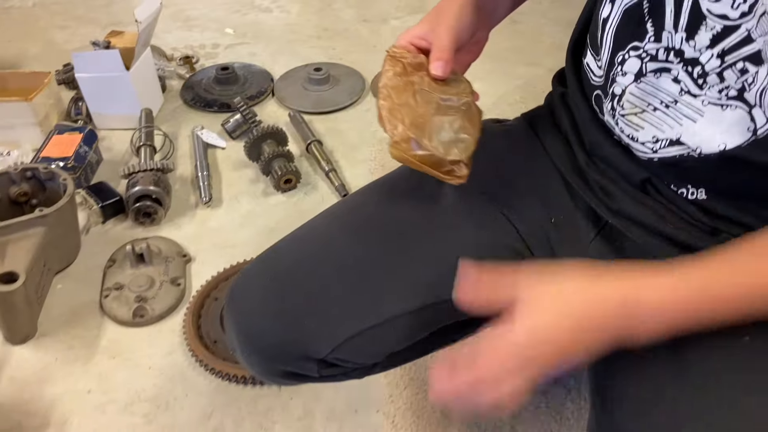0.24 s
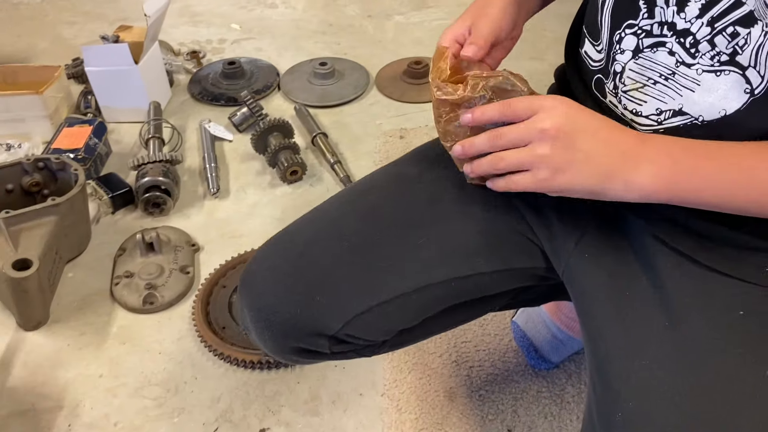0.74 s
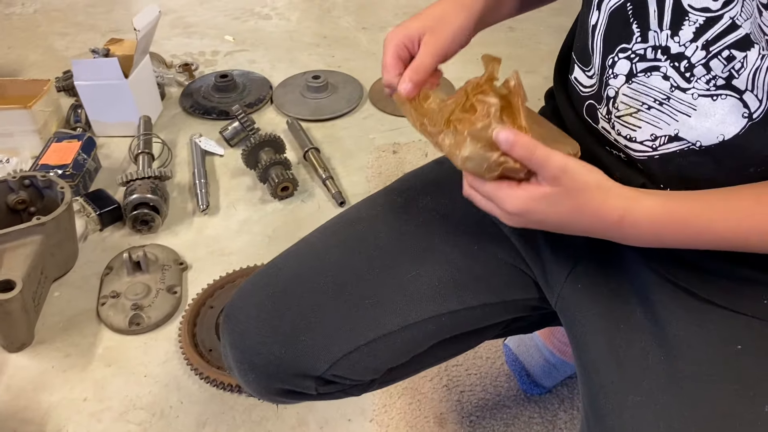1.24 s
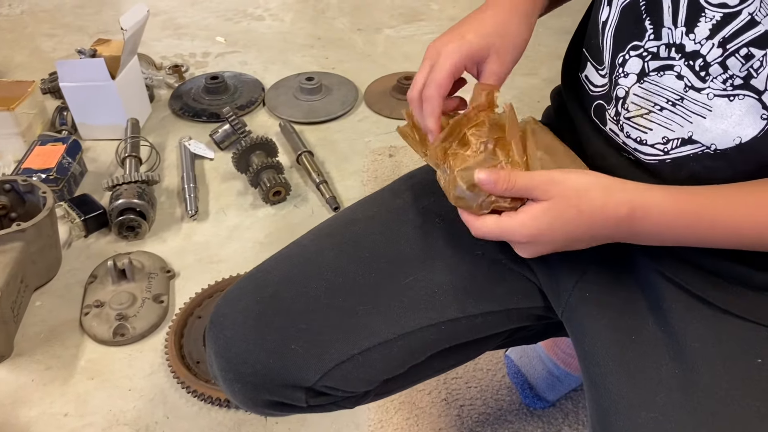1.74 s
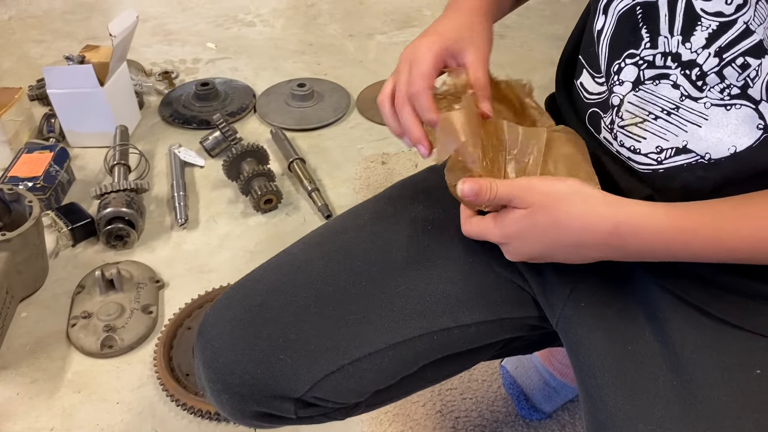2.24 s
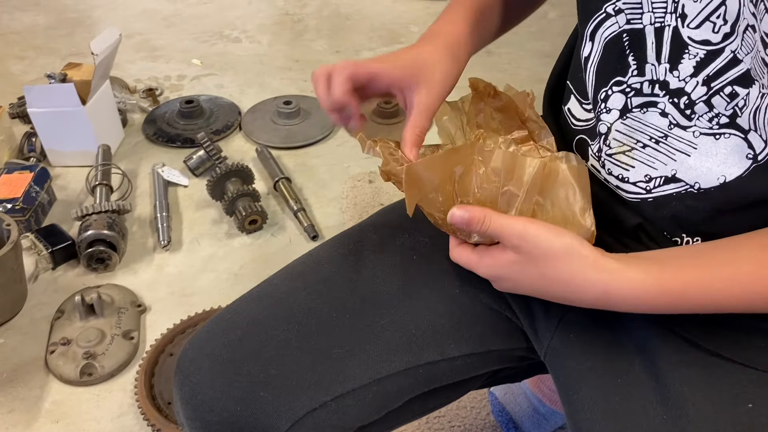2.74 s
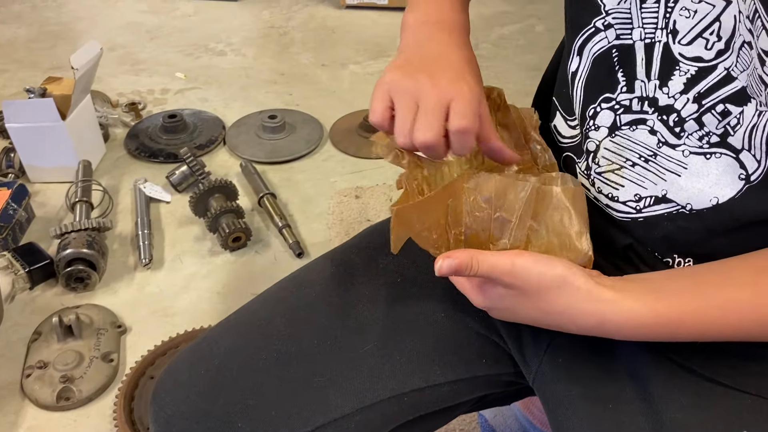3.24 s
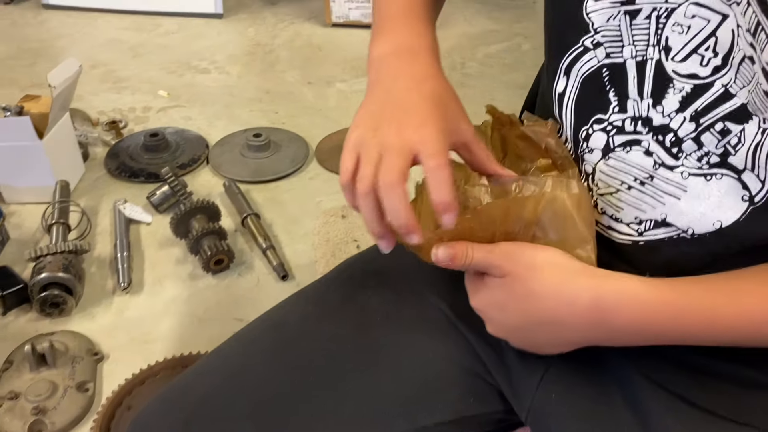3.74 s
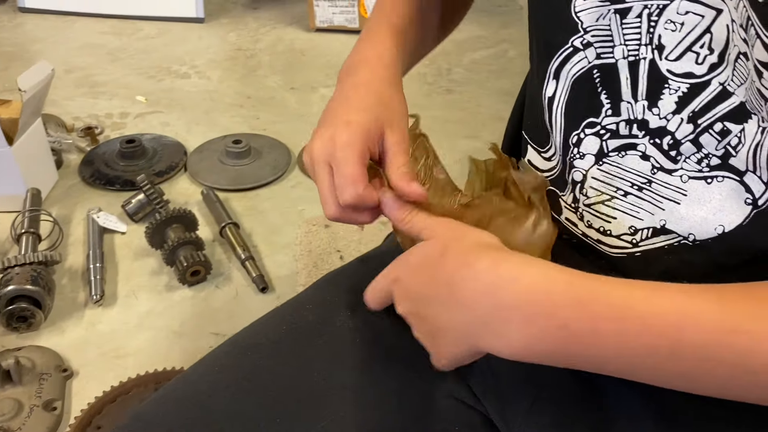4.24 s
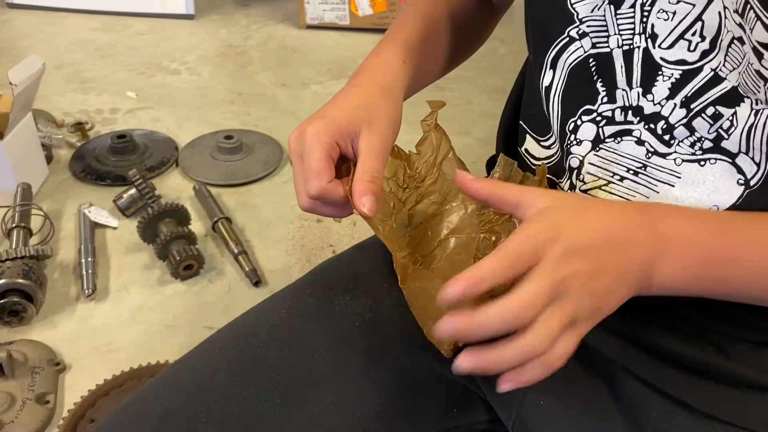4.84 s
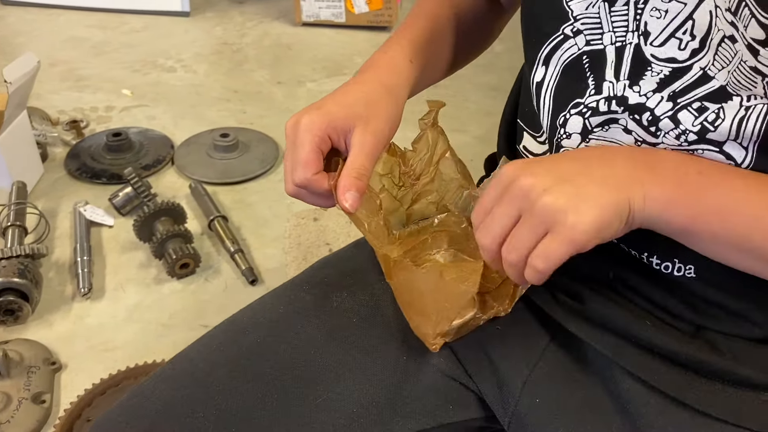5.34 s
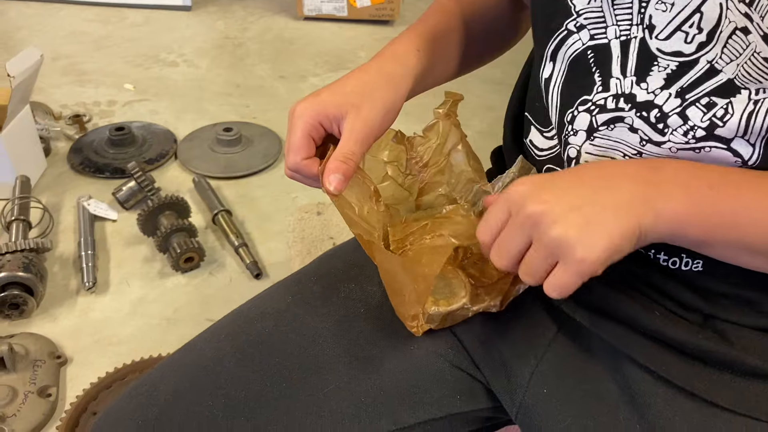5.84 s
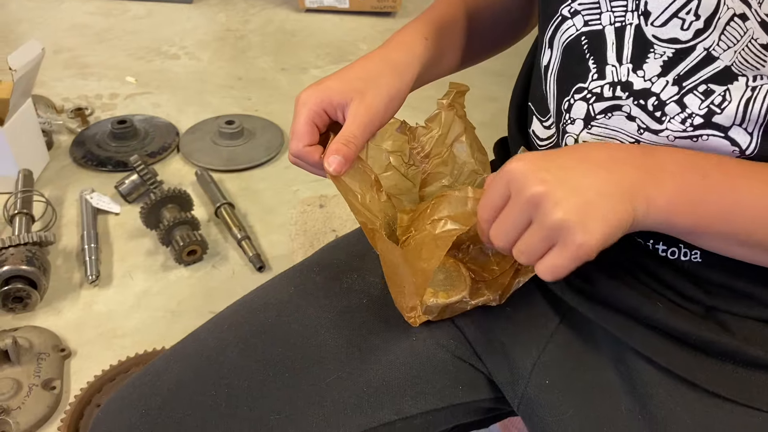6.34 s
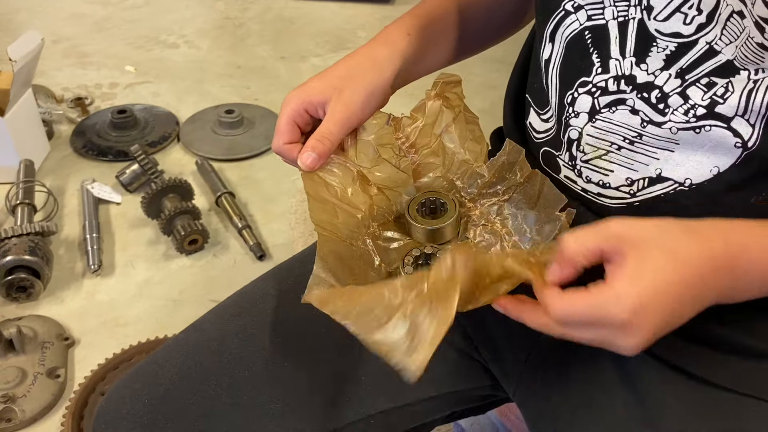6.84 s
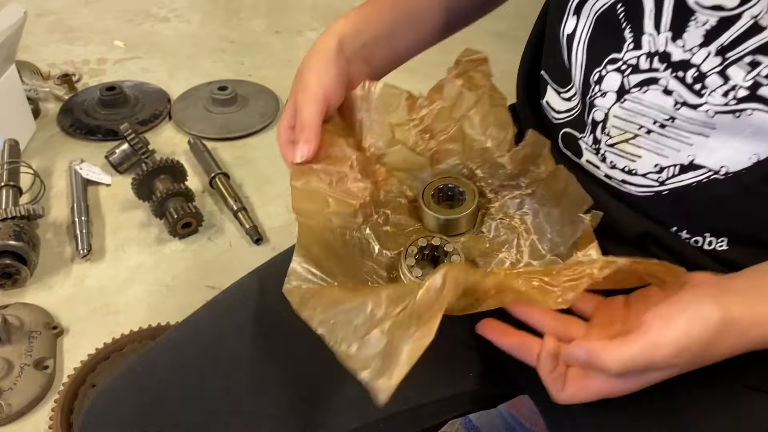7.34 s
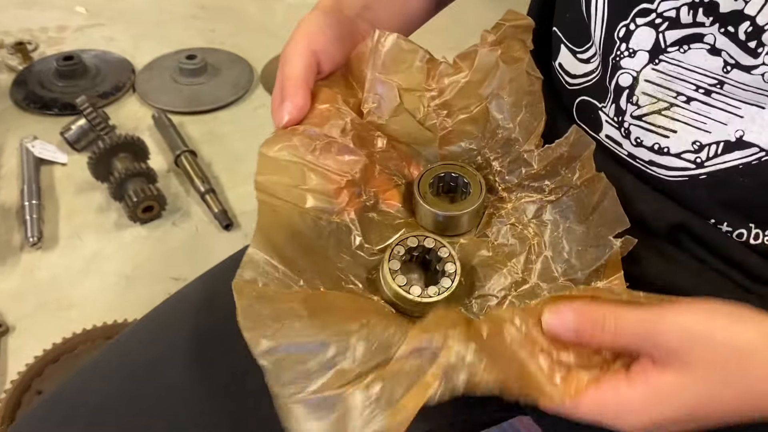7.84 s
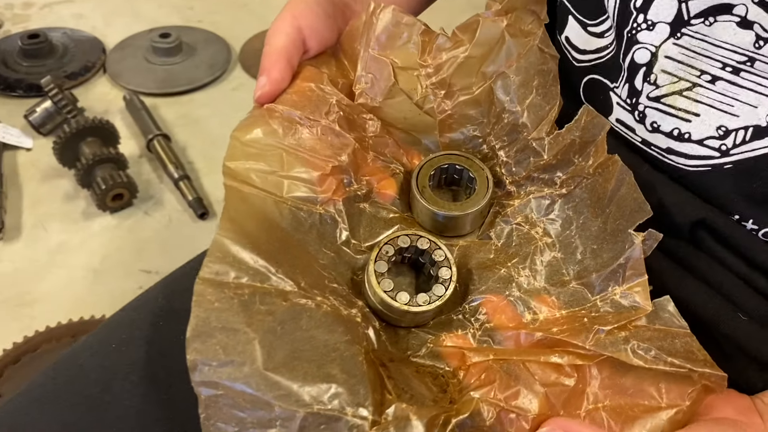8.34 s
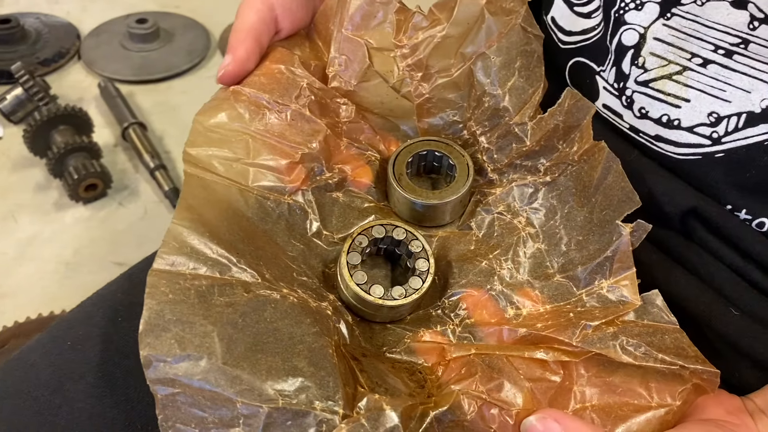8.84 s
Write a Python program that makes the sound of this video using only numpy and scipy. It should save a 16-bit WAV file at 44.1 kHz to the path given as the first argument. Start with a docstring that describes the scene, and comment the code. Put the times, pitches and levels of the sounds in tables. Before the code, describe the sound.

Stiff waxed paper crinkles, snaps and pops as hands unwrap it close by, after a hard part clacks down, over a low hum.

```python
"""Stiff waxed paper is unwrapped by hand, close to a hand-held stereo microphone.
Creases buckle with sharp snaps, the flat panels between them pop, and tiny creases crackle in clumps.
At the start a hard part is set down and rocks to rest. The hard walls of the workshop echo it all,
and mains hum and a low rumble lie underneath."""
import sys
import numpy as np
from scipy import signal
from scipy.fft import rfft, irfft, next_fast_len
from scipy.io import wavfile

SR = 44100
rng = np.random.default_rng(int(sys.argv[2]) if len(sys.argv) > 2 else 0)


def digitize_waveform(pressure):
    """Quantize a signal to 16-bit integers and store it at the path in sys.argv[1].

    Rows of a 2-D input are taken as channels; values are limited to [-1, 1].
    """
    field = np.atleast_2d(pressure).T
    bounded = np.clip(field, -1, 1)
    quanta = np.round(bounded * 32767).astype(np.int16)
    wavfile.write(sys.argv[1], SR, quanta)


N = 400860


def amp(db):
    return 10 ** (np.asarray(db) / 20)


def rms_one(x):
    return x / np.sqrt(np.mean(x ** 2) + 1e-20)


def peak_one(x):
    return x / np.max(np.abs(x), axis=-1, keepdims=True)


def colour(x, points):
    """Turns lows and highs up or down along a curve of (Hz, dB) points."""
    hz, db = np.transpose(points)
    f = np.maximum(np.fft.rfftfreq(x.shape[-1], 1 / SR), 1)
    return irfft(rfft(x) * amp(np.interp(np.log(f), np.log(hz), db)), x.shape[-1])


def cut_bass(x, hz):
    """Weakens everything below the given frequency."""
    return signal.sosfilt(signal.butter(2, hz, "high", fs=SR, output="sos"), x)


def drift(rate_hz):
    """A smooth random wobble, typically about 1 in size."""
    step = 40
    r = np.exp(-2 * np.pi * step * rate_hz / SR)
    slow = signal.lfilter([1], [1, -2 * r, r * r], rng.standard_normal(N // step + 2002))[2000:]
    return np.interp(np.arange(N) / step, np.arange(len(slow)), rms_one(slow))


def ring(x, hz, cycles):
    """Makes x ring at one pitch, fading by 60 dB in the given number of cycles."""
    r, w = amp(-60 * hz / (cycles * SR)), 2 * np.pi * hz / SR
    return signal.lfilter([0, np.sin(w)], [1, -2 * r * np.cos(w), r * r], x + 1e-18)


BURST_SAMPLES, LEAD_SAMPLES = 2048, 64
def bursts(count, rise_s, fall_s, tail_s, tail_db):
    """Bursts of noise around one clean click: a steep rise, a fast fall and a short ragged tail."""
    t = (np.arange(BURST_SAMPLES) - LEAD_SAMPLES) / SR
    fade = np.exp(-t / fall_s) + amp(tail_db) * np.exp(-t / tail_s)
    rows = rng.standard_normal((count, BURST_SAMPLES)) * np.where(t < 0, np.exp(t / rise_s), fade)
    rows[:, LEAD_SAMPLES] = 2.8   # the click
    return rows


# The tone of the rumble. Each row: frequency in Hz, relative level in dB.
RUMBLE_TONE = [(25, -27), (40, -13), (60, 0.5), (90, -2), (150, -6), (200, -16.5), (500, -45), (1500, -53),
               (6000, -46), (16000, -67)]
HUM_HZ, HUM_DB, RUMBLE_DB = 119.24, -45, -58
def hum_and_rumble():
    """Mains hum wavers a little over a low rumble and a faint hiss."""
    t = np.arange(N) / SR
    hum = amp(HUM_DB + .5 * drift(1.0)) * np.sqrt(2) * np.sin(2 * np.pi * HUM_HZ * t)
    rumble = rms_one(colour(rng.standard_normal((2, N)), RUMBLE_TONE))
    return hum + amp(RUMBLE_DB) * rumble


# How busily the hands work. Each row: time in seconds, crackle level in dB, panel flexing level in dB.
HAND_EFFORT = [(0.0, -62, -55), (0.041, -90.5, -73), (0.2, -66, -53), (0.38, -76, -63.5), (0.45, -55, -65),
               (1.2, -58, -60), (1.55, -68, -70), (1.7, -49, -60), (2.901, -62, -60), (3.1, -65, -68),
               (3.45, -53, -53), (4.149, -43.5, -58.5), (4.768, -61, -57.5), (4.85, -76.5, -91),
               (4.99, -88, -89), (5.15, -67, -80), (6.0, -65, -84), (6.9, -66.5, -68), (7.1, -51.5, -56),
               (7.8, -62, -58.5), (7.98, -66.5, -69), (8.3, -64.5, -74.5), (8.5, -82.5, -80.5),
               (9.09, -91, -81.5)]
# The fingers crumple a fold. Each row: start in seconds, hold in seconds, crackle level in dB,
# panel flexing level in dB.
SQUEEZES = [(0.094, 0.035, -51, -42), (0.5, 0.15, -48.5, -78), (0.939, 0.012, -50, -52),
            (1.08, 0.013, -44.5, -79), (1.16, 0.21, -52.5, -61.5), (1.657, 0.077, -47, -55),
            (2.062, 0.14, -44.5, -52.5), (2.35, 0.01, -47.5, -44), (2.448, 0.011, -38, -36),
            (2.625, 0.038, -46.5, -54.5), (2.822, .02, -49.5, -78), (2.93, 0.039, -47.5, -57.5),
            (3.26, 0.12, -54, -57.5), (3.502, 0.077, -46.5, -46), (3.852, 0.02, -34.5, -58),
            (4.11, 0.094, -38.5, -53), (4.422, 0.018, -44, -67), (4.671, 0.025, -44, -45.5),
            (5.068, 0.16, -53, -54), (5.254, 0.0073, -54.5, -54), (5.398, 0.03, -43, -49.5),
            (5.674, 0.026, -49, -50.5), (5.847, 0.037, -54.5, -48), (6.054, 0.046, -56.5, -57),
            (6.163, 0.0072, -48.5, -62), (6.304, 0.027, -54, -52.5), (6.405, 0.0065, -50.5, -54),
            (6.477, 0.064, -47, -50.5), (6.725, 0.011, -47, -54), (6.994, 0.045, -45.5, -43),
            (7.223, 0.0036, -41, -38), (7.399, 0.041, -59, -47), (7.683, 0.038, -43, -47.5),
            (7.807, 0.0059, -43.5, -39.5), (8.02, 0.035, -74, -59.5), (8.214, 0.019, -52, -65)]
RISE_DB_PER_S, FALL_DB_PER_S = 415, 221
def crumpling():
    """How loud crackle and flexing are over time: steady handling, plus a swell for each squeeze."""
    t = np.arange(0, N, 64) / SR
    times, *steady_db = np.transpose(HAND_EFFORT)
    start, hold, *squeeze_db = np.transpose(SQUEEZES)[:, :, None]
    fade_db = RISE_DB_PER_S * np.maximum(start - t, 0) + FALL_DB_PER_S * np.maximum(t - start - hold, 0)
    gains = []
    for steady, squeeze in zip(steady_db, squeeze_db):
        power = amp(np.interp(t, times, steady)) ** 2 + np.sum(amp(squeeze - fade_db) ** 2, axis=0)
        gains.append(np.interp(np.arange(N) / SR, t, np.sqrt(power)))
    return gains


def buckles(base_per_s, clump_db, low_hz, high_hz, cycles, swell_db):
    """Tiny buckles come in random clumps. Each rings at one of ten pitches, which swell separately."""
    sizes = amp(3.0 * np.minimum(rng.exponential(1, N), 5)) * rng.choice([-1, 1], N)
    kicks = sizes * (rng.random(N) < base_per_s * amp(clump_db * drift(25)) / SR)
    pitch_choice = rng.integers(0, 10, (2, N))   # drawn separately for each face of the sheet
    out = 0
    for k, hz in enumerate(np.geomspace(low_hz, high_hz, 10)):
        swelling = kicks * (pitch_choice == k) * amp(swell_db * drift(23.0))
        softened = ring(swelling, hz, cycles=1.1)
        out += rms_one(ring(softened, hz, cycles))
    return rms_one(out)


def ticks(per_s, spread_db):
    """Lone small creases snap across the whole treble, each ringing briefly at one of five pitches."""
    sizes = amp(spread_db * np.minimum(rng.exponential(1, N), 4)) * (rng.random(N) < per_s / SR)
    pitch_choice = rng.integers(0, 5, N)
    noise = rng.standard_normal((2, N))
    decay = np.exp(-1 / (.0007 * SR))
    out = 0
    for k, hz in enumerate(np.geomspace(1600, 7000, 5)):
        crack = noise * signal.lfilter([1], [1, -decay], sizes * (pitch_choice == k) + 1e-18)
        out += rms_one(ring(crack, hz, cycles=17.0)) + amp(-16.5) * rms_one(crack)
    return rms_one(out)


# The bright tone of the paper, for crackle and snaps. Each row: frequency in Hz, boost or cut in dB.
PAPER_TONE = [(900, -4), (1600, 0), (2600, 3), (4500, 4), (7000, 7), (10000, 11.5), (13000, 11.5),
              (15700, -5), (16300, -26.5)]
def rustle():
    """Small creases crackle and whole panels flex with a duller sound as the hands work the sheet."""
    crackle_gain, flex_gain = crumpling()
    crackle = buckles(base_per_s=8300, clump_db=3.8, low_hz=1010, high_hz=14000, cycles=11, swell_db=6.7)
    crackle = signal.lfilter([1], [1, -.6], colour(crackle, PAPER_TONE))   # duller than the big snaps
    crackle = rms_one(crackle) + amp(-7.0) * ticks(per_s=110, spread_db=3.3)
    flex = buckles(base_per_s=1500, clump_db=3.0, low_hz=260, high_hz=1900, cycles=8, swell_db=4.0)
    return crackle_gain * crackle + flex_gain * flex


# The hard part touches down. Each row: start in seconds, level in dB.
PART_TOUCHES = [(0.0668, -29), (0.0723, -9.5), (0.0796, -27.5), (0.125, -30), (0.154, -34), (0.197, -32),
                (0.277, -34)]
# The notes it rings with. Each row: pitch in Hz, relative level in dB, seconds to fade by 60 dB.
PART_NOTES = [(324, -22, .09), (850, -4, .03), (950, -2.5, .06), (1170, 3, 0.042), (1360, -11, .06),
              (2350, -16, 0.057), (2430, -19.5, 0.073), (2600, -4.5, .018), (3200, -12.5, .02),
              (4000, -12, .015)]
def set_down():
    """A hard part rocks to rest. Each touch is a short rattle that sets all its notes ringing."""
    starts, touch_db = np.transpose(PART_TOUCHES)
    out = np.zeros(N)
    rattles = bursts(len(PART_NOTES), rise_s=.0001, fall_s=.0002, tail_s=.012, tail_db=-26)
    for (hz, note_db, fade_s), rattle in zip(PART_NOTES, rattles):
        softness_db = 0.36 * (touch_db - touch_db.max()) * np.log2(hz / 900)   # light touches are duller
        taps = np.zeros(SR)
        taps[(starts * SR).astype(int)] = amp(touch_db + note_db + softness_db)
        strikes = np.convolve(taps, peak_one(np.diff(rattle)))[LEAD_SAMPLES:SR + LEAD_SAMPLES]
        out[:SR] += ring(strikes, hz, cycles=hz * fade_s)
    return cut_bass(out, hz=260)


# Creases giving way. Each row: start in seconds, level in dB, centre pitch in Hz.
CREASE_SNAPS = [(0.0724, -14, 3000), (0.403, -31, 4800), (0.471, -25, 6400), (0.5055, -34, 3200),
                (0.526, -31, 2770), (0.5517, -33, 6300), (0.5556, -21.5, 5560), (0.6157, -23.5, 5200),
                (0.669, -33, 7350), (0.6805, -33, 6000), (0.71, -38, 4900), (0.8406, -27, 5200),
                (0.861, -24, 5500), (0.998, -27, 4830), (1.0302, -29.5, 9500), (1.0791, -24, 4500),
                (1.155, -31, 2160), (1.1938, -19.5, 4960), (1.214, -22, 5530), (1.29, -28.5, 4900),
                (1.337, -21, 7040), (1.636, -22.5, 6800), (1.646, -22, 3620), (1.7017, -28.5, 3300),
                (1.754, -26, 4100), (1.819, -21, 5800), (1.844, -27, 2300), (1.9236, -28, 5400),
                (2.078, -20, 3520), (2.0946, -29, 4000), (2.152, -29, 3000), (2.1862, -28.5, 2560),
                (2.225, -30.5, 1710), (2.256, -26, 4300), (2.3505, -27, 3900), (2.3606, -21, 4600),
                (2.3738, -22, 5870), (2.4457, -22, 3580), (2.47, -20.5, 4830), (2.499, -24, 4160),
                (2.5368, -31.5, 4760), (2.6224, -31, 6600), (2.727, -27, 6200), (2.8141, -20.5, 6500),
                (2.8952, -29, 2640), (2.904, -30.5, 4950), (3.079, -21.5, 7260), (3.2053, -21.5, 4020),
                (3.245, -23.5, 4700), (3.3526, -39, 3400), (3.522, -27, 4100), (3.633, -23.5, 3840),
                (3.6669, -26.5, 3700), (3.684, -29, 5540), (3.712, -12, 4940), (3.746, -31.5, 3450),
                (3.7546, -9, 4750), (3.7654, -26.5, 4100), (3.771, -25, 3080), (3.835, -32, 6750),
                (3.846, -18.5, 5800), (3.8519, -15, 6230), (3.86, -29, 3470), (3.866, -20, 3400),
                (3.873, -17, 3270), (3.885, -26.5, 3060), (3.893, -15, 3900), (3.907, -21, 3520),
                (3.9783, -19.5, 4000), (3.992, -20, 5300), (4.038, -25.5, 6200), (4.0504, -15, 3000),
                (4.059, -14, 3650), (4.104, -29.5, 4330), (4.117, -26, 3000), (4.12, -17.5, 4500),
                (4.137, -17.5, 4220), (4.1443, -19.5, 3530), (4.155, -22, 3650), (4.1651, -29.5, 4800),
                (4.1743, -19.5, 3330), (4.1892, -10, 2950), (4.203, -32.5, 3520), (4.22, -20.5, 4200),
                (4.231, -17.5, 3450), (4.4387, -22, 3520), (4.53, -24.5, 3580), (4.5503, -24.5, 4200),
                (4.5928, -31.5, 4700), (4.613, -29, 3400), (4.636, -32, 4200), (4.68, -25, 3520),
                (5.066, -36, 3420), (5.09, -31.5, 6240), (5.1295, -22, 2300), (5.1338, -13.5, 6040),
                (5.389, -29.5, 4500), (5.459, -23.5, 5930), (5.687, -26.5, 1550), (6.0845, -32, 2260),
                (6.094, -22, 4100), (6.169, -23.5, 5400), (6.3144, -23, 4150), (6.3946, -18.5, 3580),
                (6.4765, -16, 5350), (6.5695, -29, 2660), (6.5766, -29, 4470), (6.6104, -22.5, 2070),
                (6.702, -31.5, 2800), (6.736, -20.5, 4370), (6.777, -26.5, 4960), (6.8496, -30.5, 1640),
                (6.9837, -22, 4950), (6.996, -29, 5240), (7.0203, -22.5, 6870), (7.037, -26, 2770),
                (7.0758, -14.5, 4060), (7.2198, -19.5, 2780), (7.228, -21, 2700), (7.2635, -26.5, 2870),
                (7.268, -20.5, 4500), (7.165, -32.5, 3900), (7.344, -31, 3300), (7.424, -14.5, 4450),
                (7.5407, -25, 4500), (7.6088, -26.5, 3540), (7.6483, -29, 4700), (7.708, -28.5, 3000),
                (7.7482, -27, 4140), (7.8028, -23, 6660), (7.813, -22.5, 4600), (7.896, -28, 2850),
                (7.93, -27.5, 2900), (8.011, -12.5, 4000), (8.018, -26.5, 6460), (8.206, -23.5, 3370),
                (8.218, -17, 4130), (8.229, -18.5, 5530), (8.2741, -20, 2840), (8.3694, -24.5, 5600),
                (8.599, -58.5, 4530), (8.622, -57, 5600), (8.9274, -39, 1970)]
def snaps():
    """A crease buckles with a crack, brighter if the crease is short. Four nearby pitches ring out."""
    out = np.zeros(N + BURST_SAMPLES)
    cracks = bursts(len(CREASE_SNAPS), rise_s=.00025, fall_s=.0006, tail_s=.007, tail_db=-19)
    nearby = 1.9 ** rng.uniform(-0.7, 1, (len(CREASE_SNAPS), 4))
    for (start, db, hz), crack, ratios in zip(CREASE_SNAPS, cracks, nearby):
        crack = cut_bass(crack, 0.2 * hz)   # a short crease moves no bass
        body = peak_one(ring(crack, hz, cycles=3))
        ringing = peak_one(sum(ring(crack, min(hz * r, SR / 3), cycles=23) for r in ratios))
        bright = hz / 4000 * peak_one(crack)
        i = round(start * SR) - LEAD_SAMPLES
        out[i:i + BURST_SAMPLES] += amp(db) * peak_one(amp(-2.0) * body + ringing + amp(-0.5) * bright)
    return colour(out[:N], PAPER_TONE)


# Panels flipping over, plus a few crease snaps that ring at a clear pitch. Each row: start in seconds, level in
# dB, pitch in Hz.
RINGING_POPS = [(0.403, -39.5, 705), (0.472, -39.5, 614), (0.528, -33, 1500), (0.691, -31, 1460),
                (0.692, -42, 530), (1.153, -35, 1190), (1.639, -28.5, 664), (1.756, -30, 730),
                (2.226, -28.5, 1470), (2.374, -33, 675), (2.449, -26, 520), (2.845, -39, 1170),
                (2.893, -38, 1200), (3.245, -30.5, 1320), (3.568, -32, 435), (3.712, -17, 1490),
                (3.745, -32, 1090), (3.852, -25.5, 1100), (3.868, -27, 1350), (3.886, -24.5, 980),
                (3.906, -25, 505), (3.95, -34.5, 890), (4.052, -22, 405), (4.118, -29.5, 546),
                (4.136, -28.5, 740), (4.186, -24.5, 1270), (4.208, -38, 480), (4.222, -30, 1190),
                (4.44, -26.5, 835), (4.529, -34, 990), (4.551, -30, 950), (4.595, -30.5, 660),
                (4.615, -33.5, 413), (4.686, -31, 883), (5.134, -22, 770), (5.429, -36, 1130),
                (5.684, -29, 207), (5.776, -38.5, 755), (6.394, -23.5, 1920), (6.606, -33, 1460),
                (6.85, -33, 1450), (6.85, -39.5, 605), (7.223, -23, 1300), (7.262, -28, 1380),
                (7.708, -28, 1010), (7.792, -29, 740), (7.801, -26.5, 464), (7.862, -41, 367),
                (8.022, -36, 221), (8.11, -35, 840), (8.218, -24, 930), (8.224, -34, 501), (8.273, -20, 950),
                (8.276, -32, 266), (8.288, -12.5, 2154)]
def pops():
    """A panel flips, or a crease snaps with a clear ring, and it rings at two close pitches. Small, tight
    panels ring for more cycles."""
    out = np.zeros(N + BURST_SAMPLES)
    pushes = bursts(len(RINGING_POPS), rise_s=.0001, fall_s=.0008, tail_s=.006, tail_db=-15)
    for (start, db, hz), push in zip(RINGING_POPS, pushes):
        flip = ring(np.diff(push, prepend=0), hz, cycles=2)
        ringing = sum(ring(flip, hz * r, cycles=5 + hz / 200) for r in (.96, 1.04))
        i = round(start * SR) - LEAD_SAMPLES
        out[i:i + BURST_SAMPLES] += amp(db) * peak_one(ringing)
    return out[:N]


BASS_ECHO_S, WALL_DULLING_HZ, ROOM_DB = 0.4, 5800, -23
def room(x):
    """Sound bounces between hard walls: eight repeating echoes a side, duller on every round."""
    size = next_fast_len(N + SR // 2)
    f = np.fft.rfftfreq(size, 1 / SR)
    fade_s = BASS_ECHO_S / (1 + f / WALL_DULLING_HZ)
    echoes = np.zeros((2, len(f)), complex)
    for k, lag_s in enumerate(rng.uniform(0.007, 0.045, 16)):
        bounce = amp(-60 * lag_s / fade_s) * np.exp(-2j * np.pi * f * lag_s)
        echoes[k % 2] += bounce / (1 - bounce) * (-1) ** (k // 2)
    for lag_s in (.0017, .0043):   # rough walls smear each echo
        delay = np.exp(-2j * np.pi * f * lag_s)
        echoes *= (delay - .6) / (1 - .6 * delay)
    return irfft(rfft(x, size) * echoes, size)[:, :N]


def scene():
    """The sheet's two faces buckle together but ring differently; the part, room and hum join them."""
    faces = np.array([snaps() + pops() for face in range(2)])
    direct = faces + rustle() + set_down()
    return direct + amp(ROOM_DB) * room(direct) + hum_and_rumble()


# How the microphone's right side hears, next to its left. Each row: frequency in Hz, boost or cut in dB,
# how far the wave is ahead in radians, likeness from 0 to 1.
RIGHT_SIDE = [(0, 0, 0, .9), (100, 0, 0, .996), (430, .4, -.2, .95), (600, 2, -.6, .86),
              (1000, -4, -1.2, .66), (1600, -1.5, -2.2, .45), (1850, -3, -4.7, .3), (2300, -4, -6.5, .75),
              (3200, -4.2, -6.9, .88), (5200, -7.2, -6.3, .65), (6900, -1.1, -6.35, .96),
              (15200, 0, 6.1, .93), (15900, 0, 6.5, .9)]
TOP_HZ = 17000
def record(dry):
    """The left side hears one face; the right hears both, with a weaker middle and the top early."""
    hz, db, lead, likeness = np.transpose(RIGHT_SIDE)
    size = next_fast_len(N + 1024)
    f = np.fft.rfftfreq(size, 1 / SR)
    near_face, far_face = rfft(dry, size)
    alike = np.interp(f, hz, likeness)
    blend = alike * near_face + np.sqrt(1 - alike ** 2) * far_face
    shading = amp(np.interp(f, hz, db)) * np.exp(1j * np.interp(f, hz, lead))
    right = irfft(blend * shading, size)[:N]
    stereo = cut_bass(np.array([dry[0], right]), hz=45)
    return signal.sosfilt(signal.cheby2(24, 60, TOP_HZ, fs=SR, output="sos"), stereo)   # cut the very top


dry = scene()
out = record(dry)
digitize_waveform(out)
```